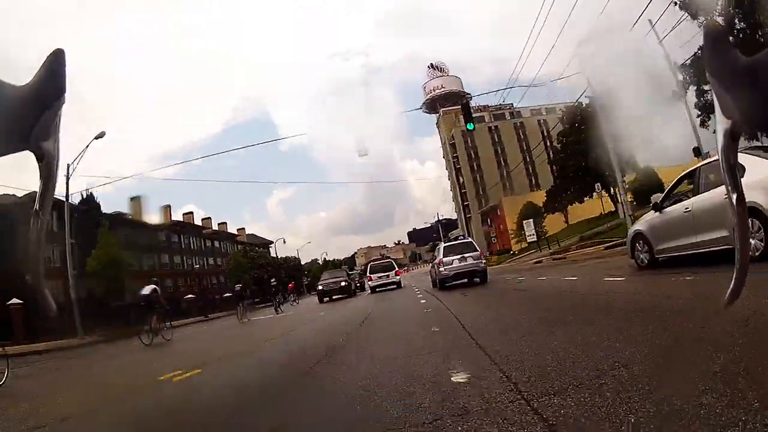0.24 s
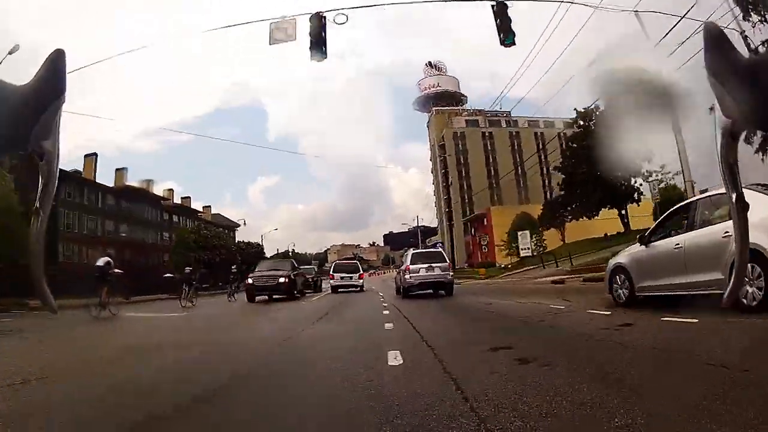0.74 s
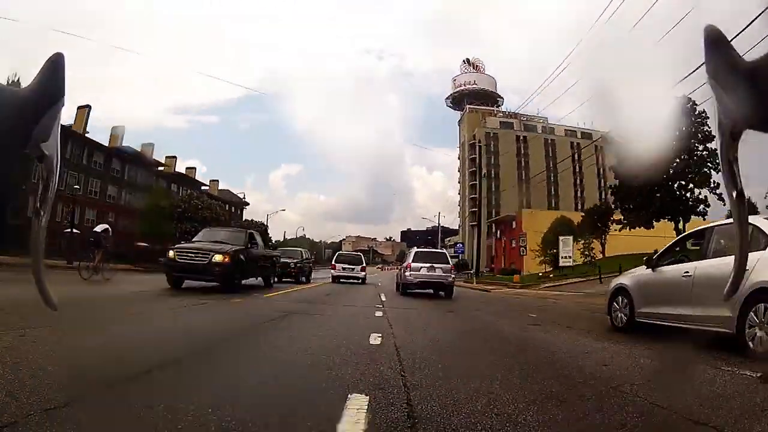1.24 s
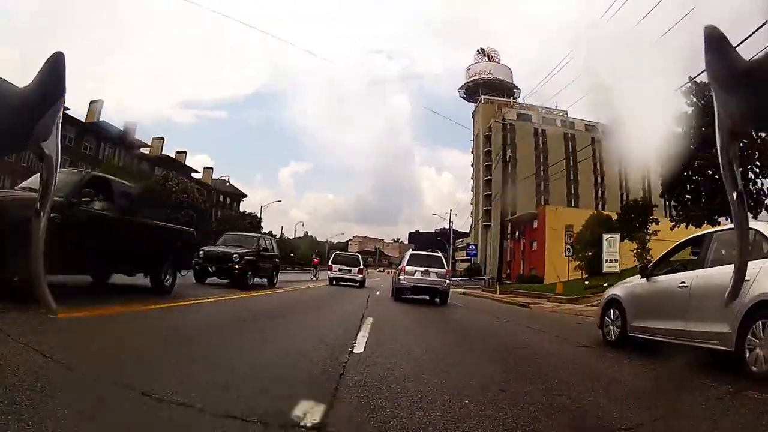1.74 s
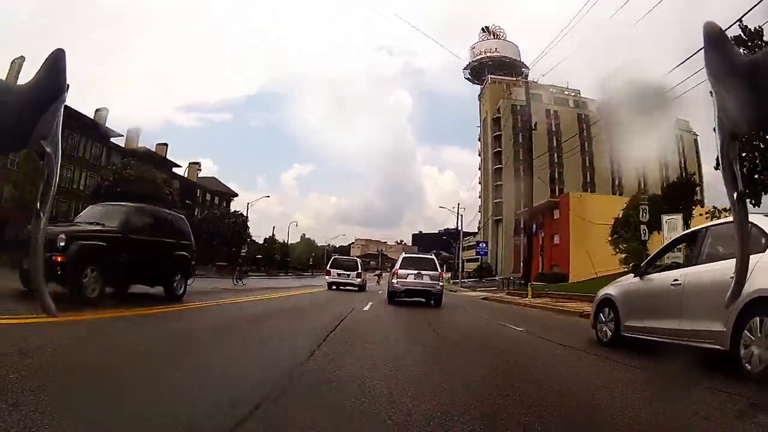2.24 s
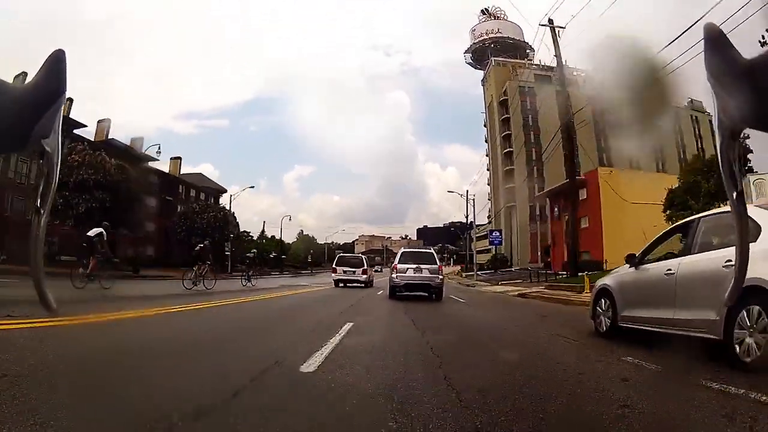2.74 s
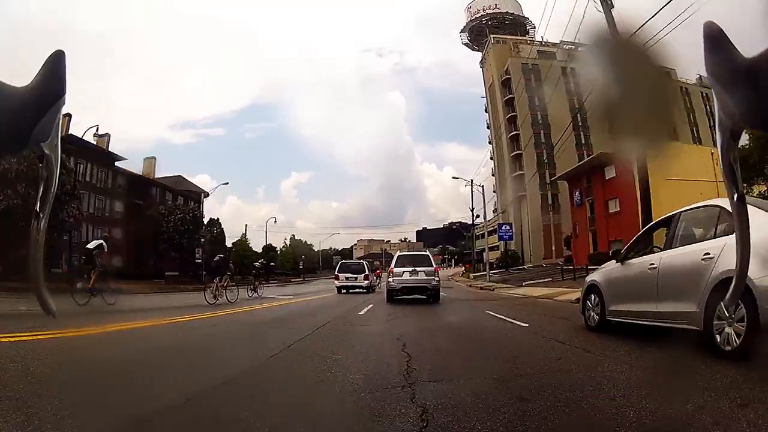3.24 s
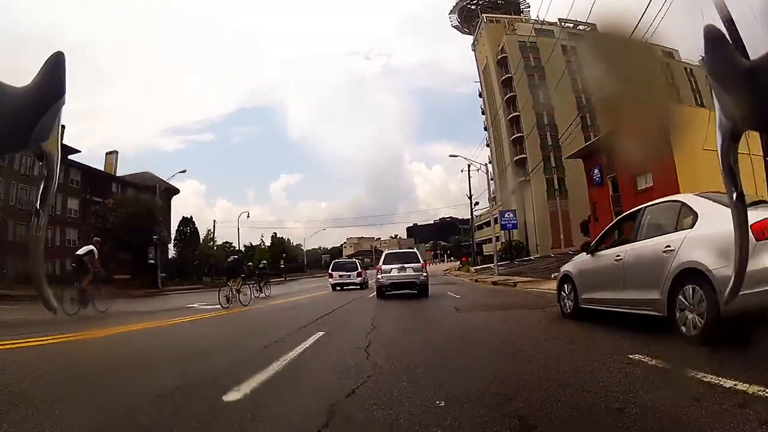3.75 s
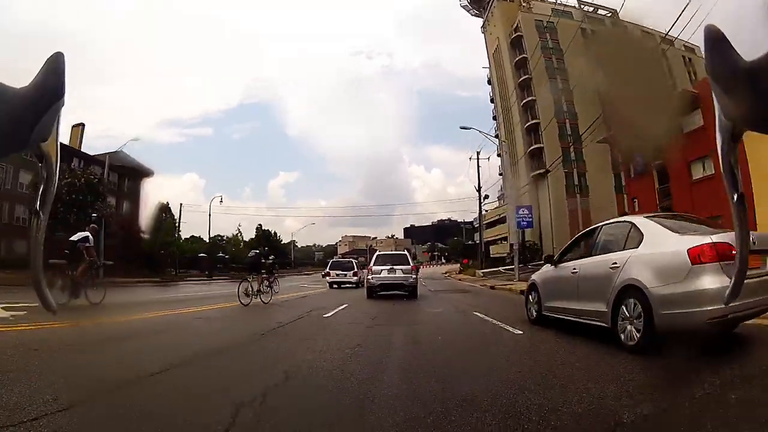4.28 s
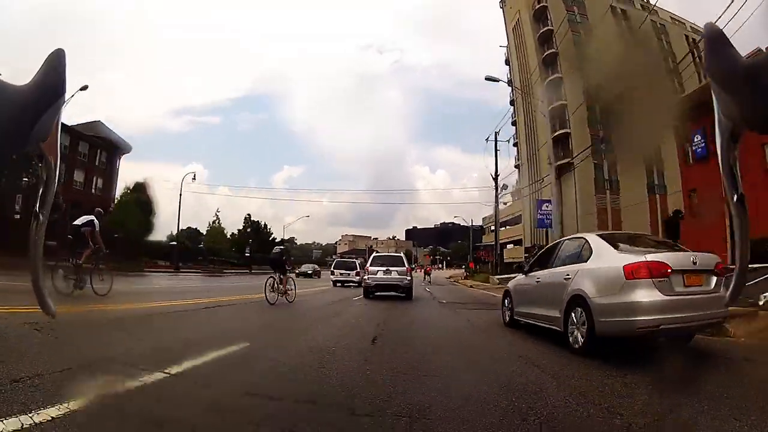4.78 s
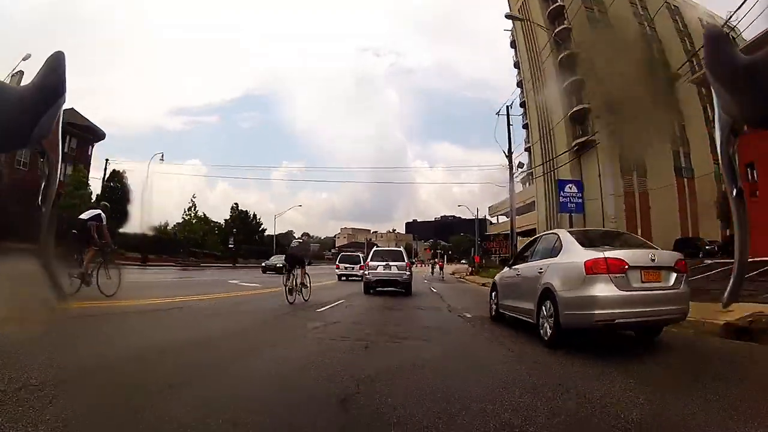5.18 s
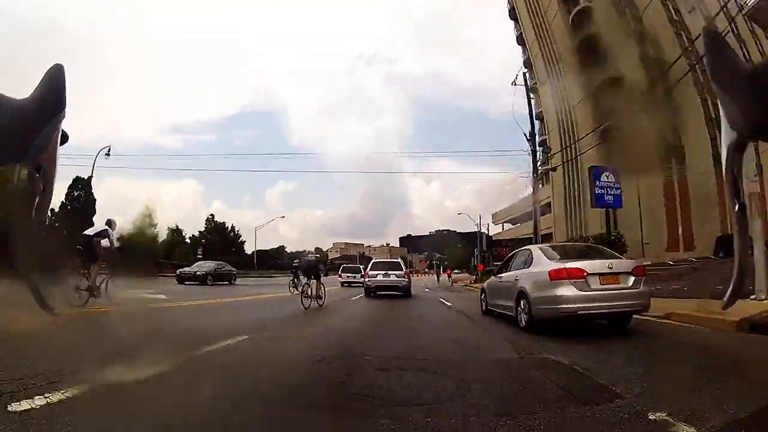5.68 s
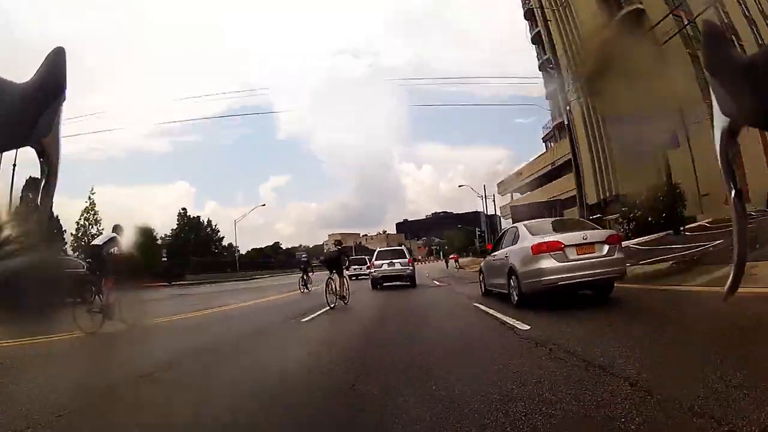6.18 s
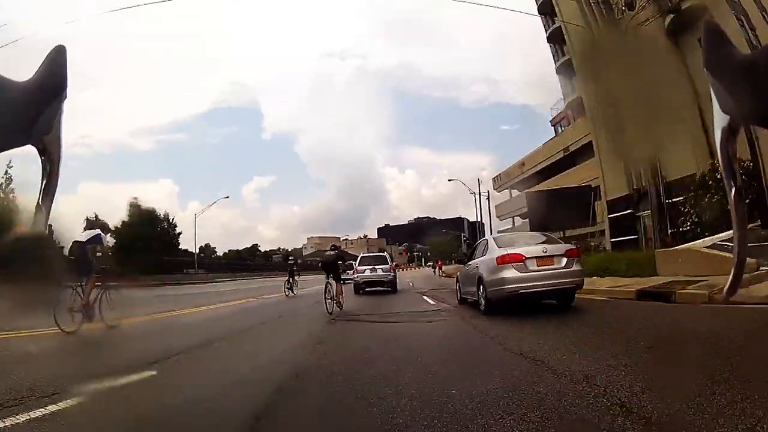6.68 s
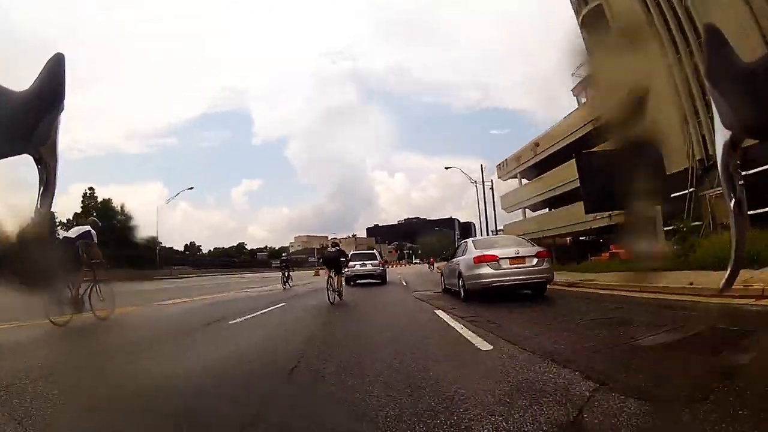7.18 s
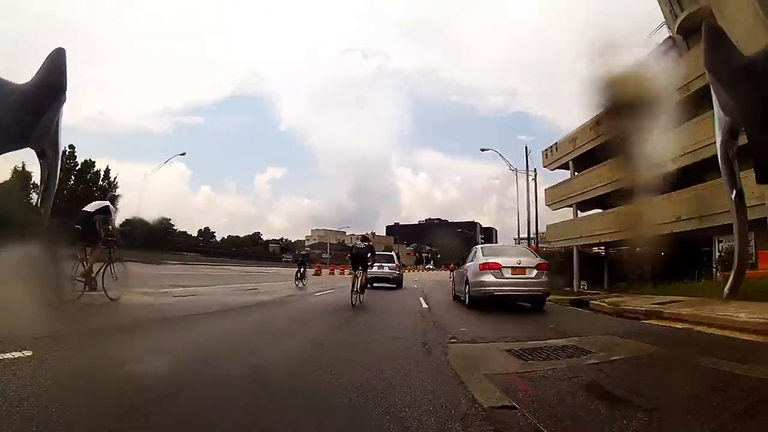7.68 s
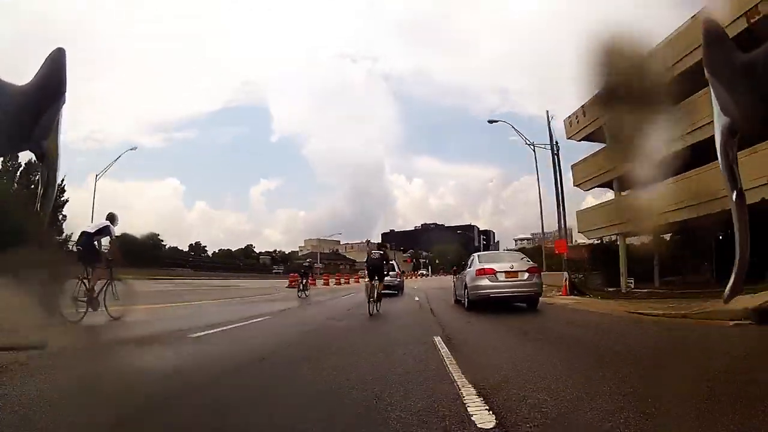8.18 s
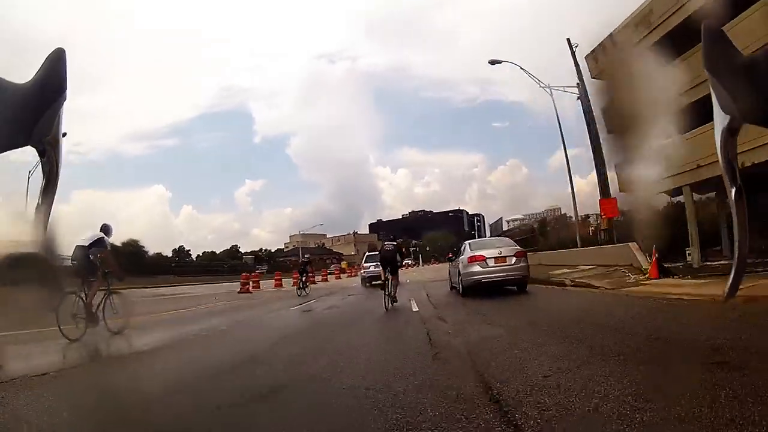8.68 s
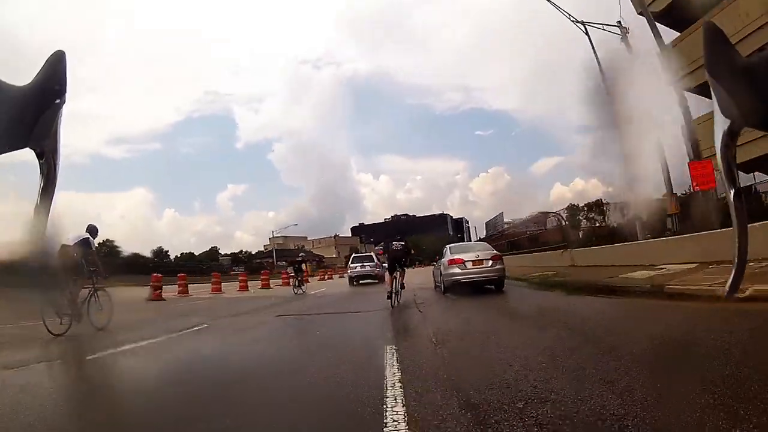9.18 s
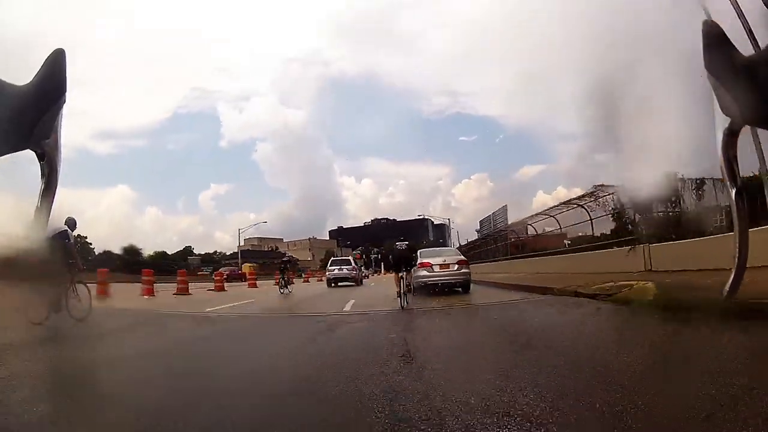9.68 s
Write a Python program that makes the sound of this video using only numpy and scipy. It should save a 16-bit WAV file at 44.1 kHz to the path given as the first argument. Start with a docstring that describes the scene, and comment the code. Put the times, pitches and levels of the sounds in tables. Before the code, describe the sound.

A road bike rolls over worn asphalt, heard through its handlebar: humming, tyre roar, sparse clicks, then heavy jolts and busy loose-case chatter.

```python
"""Road bike with a rattling handlebar camera

A road bike rolls over worn city asphalt, heard from a cased camera bolted to the handlebar.
Shaped noise makes the low rumble, the tyre roar that comes up through the frame, and the bar's 125 Hz hum.
The loose mount chatters with dry clicks, decaying modes of the case; jolts are short low swings.
Bright noise bursts are the chain. A limiter ducks everything after each loud knock,
and an uneven sample clock adds a thin sizzle."""
import sys
import numpy as np
from scipy import signal
from scipy.fft import rfft, irfft
from scipy.io import wavfile
from scipy.ndimage import uniform_filter1d, minimum_filter1d

SR = 44100
rng = np.random.default_rng(int(sys.argv[2]) if len(sys.argv) > 2 else 0)


def wrap_up_sound(samples):
    """Save the sound to the file named by the first command line argument, as 16-bit audio."""
    columns = np.atleast_2d(samples).T
    # keep every value between -1 and 1, then stretch to whole-number steps
    tamed = np.clip(columns, -1, 1)
    steps = np.round(tamed * 32767).astype(np.int16)
    wavfile.write(sys.argv[1], SR, steps)


N = 437913
TIME = np.arange(N) / SR
HZ = np.fft.rfftfreq(N, 1 / SR)

# shaking of the bike apart from rough patches: t/s, road rumble level/dB, handlebar hum level/dB
RIDE_LEVELS = [(0, -38, -43.5), (0.3, -34.5, -31), (1.1, -32, -31), (1.7, -31, -28), (2.6, -33.5, -34),
               (3.6, -34, -30.5), (4.3, -35.5, -30.5), (5.2, -34, -32), (5.7, -24.5, -35),
               (6.6, -34, -38.5), (7.7, -35, -37.5), (8.8, -32.5, -35), (9.93, -31.5, -32.5)]


def gain_of(db):
    """Decibel law: 20 dB is a factor of ten in amplitude."""
    return 10 ** (np.asarray(db) / 20)


def evened(x):
    """Normalisation of the mean power: scales to rms 1."""
    return x / np.sqrt(np.mean(x ** 2) + 1e-20)


def curves(rows):
    """Linear interpolation through time of each column of a table."""
    s, *columns = np.transpose(rows)
    return [np.interp(TIME, s, column) for column in columns]


def colour(points, at=HZ):
    """Spectral envelope: gains at the given frequencies, interpolated in dB over log frequency."""
    hz, db = np.transpose(points)
    return gain_of(np.interp(np.log(at + 1), np.log(hz), db))


def noise(gains):
    """Linear filtering of white noise: the given spectrum at rms 1."""
    spectrum = rfft(rng.standard_normal(N)) * gains
    return evened(irfft(spectrum, N))


def steadied(x, size):
    """Envelope normalisation: keeps the quick flutter of a noise and removes its slow swells."""
    local_power = uniform_filter1d(x ** 2, size)
    return x / np.sqrt(local_power + 1e-6)


def resonance(hz, width_hz):
    """Resonance curve: a steep-sided peak of gain 1 over HZ."""
    return 1 / (1 + ((HZ - hz) / width_hz * 2) ** 2 / 2) ** 1.57


def swell(u):
    """Critically damped impulse response: rises to 1 at u = 1, then dies away."""
    return u * np.exp(1 - u)


def add(mix, s, sound):
    """Superposition: mixes a sound in at time s."""
    part = mix[max(round(s * SR), 0):][:len(sound)]
    part += sound[:len(part)]


def patches(patch_s=0.08):
    """Common excitation: shaking in dB swells and fades over patch_s each way at each rough patch."""
    # rough patches of asphalt that set the handlebar throbbing: t/s, rise of the hum level/dB
    rough_spots = [(0.5, 6), (1.6, -0.5), (1.92, 7), (3.15, 0.5), (3.9, 2.5), (4.62, 0), (5.62, 6.5),
                   (6.12, 16), (7.47, 5), (8.29, 12.5), (8.62, 9), (9.92, 6.5)]
    return sum(db * np.exp(-((TIME - s) / patch_s) ** 2) for s, db in rough_spots)


def road_rumble(shake_db, patch_share=0.27):
    """Random vibration: the bike shaking on the road, a low noise that follows part of each patch."""
    # spectrum of the shaking: f/Hz, level per Hz/dB (relative)
    shaking = [(8, -28), (18, -15), (26, 2.5), (35, -1), (55, -2), (80, -2.5), (105, 0), (140, -2),
               (172, -10.5), (205, -22.5), (270, -46), (500, -45), (2000, -100)]
    rumble_db = curves(RIDE_LEVELS)[0]
    return gain_of(rumble_db + patch_share * shake_db) * steadied(noise(colour(shaking)), size=7000)


def handlebar_hum(shake_db, bar_hz=125, width_hz=7):
    """Narrow-band random response: one lightly damped bending mode gives a throbbing hum."""
    narrow = 1 / (1 + ((HZ - bar_hz) / width_hz) ** 2) ** 1.32
    hum_db = curves(RIDE_LEVELS)[1]
    return gain_of(hum_db + shake_db) * steadied(noise(narrow), size=5000)


def tyre_roar(shake_db, patch_share=0.17, coarseness_db=1.24):
    """Forced vibration: the grain of the asphalt excites the resonances of frame and case."""
    # resonances of frame and case under the tyre noise: f/Hz, width/Hz, level/dB
    modes = [(398, 61, 2), (444, 24, -2.5), (523, 60, 1), (568.6, 35, 3.5), (609, 127, -3), (832, 87, 0),
             (990, 220, -2.5), (1133, 96, 0.5), (1575, 75, -9.5), (1797, 143, -9.5), (2011, 233, -8.5),
             (2285, 100, -18), (2793, 180, -26.5), (3353, 386, -24.5)]
    # tyre noise between the resonances: f/Hz, level per Hz/dB (relative)
    floor = [(100, -17), (200, -37), (300, -43), (700, -15.5), (1350, -15.5), (2100, -18.5), (2550, -72),
             (4000, -44), (5000, -41.5), (6000, -63), (8000, -52), (10000, -37), (16000, -65)]
    # tyre roar apart from rough patches: t/s, level/dB
    roar_levels = [(0, -46.5), (0.17, -38), (0.7, -40), (1.7, -38.5), (2.3, -40.5), (2.6, -38),
                   (3.25, -39.5), (3.5, -39), (4.15, -41), (4.95, -38.5), (5.6, -40), (6.35, -29),
                   (6.7, -42), (6.95, -36), (7.4, -42.5), (7.8, -37), (8.5, -35), (9.05, -40.5),
                   (9.55, -37), (9.93, -41.5)]
    power = colour(floor) ** 2
    for hz, width_hz, db in modes:
        power += (gain_of(db) * resonance(hz, width_hz)) ** 2
    coarseness = noise(1 / (1 + (HZ / 40) ** 2))  # slow variation of the asphalt's grain
    grain = noise(np.sqrt(power)) * gain_of(coarseness_db * coarseness)
    return gain_of(curves(roar_levels)[0] + patch_share * shake_db) * grain


def case_ring(hardness, detune=0.048, spread_db=3.0, contact_s=0.00023,
              rasp_db=-19, rasp_s=0.0011, push_db=-15, push_s=0.00087):
    """Modal synthesis: a contact pushes, rasps and rings the case; hard ones favour higher modes."""
    # modes of the camera case: f/Hz, soft-knock level/dB, hard-knock level/dB, t60/s
    case_modes = [(288, -17.5, -18.5, 0.029), (510, -6, -14, 0.0094), (998, -1.5, 1, 0.0078),
                  (1244, 9.5, -0.5, 0.0062), (1672, -1.5, -10, 0.015), (2104, -9, 5, 0.011),
                  (3213, -20.5, -3.5, 0.0092), (3720, -31, -13, 0.014), (4900, -42, -18.5, 0.014),
                  (6530, -5.5, -4.5, 0.0011)]
    # the rasp of a contact: f/Hz, level per Hz/dB (relative)
    rasp_spectrum = [(300, -6), (1000, 10.5), (2200, 7), (2800, -38), (4600, -9), (6100, -53), (7700, -7.5),
                     (11000, -13), (16000, -43)]
    t = np.arange(1024) / SR
    hz, soft_db, hard_db, t60 = np.transpose(case_modes)[:, :, None]
    shift, weight = rng.standard_normal((2, len(case_modes), 1))  # no two contacts alike
    db = soft_db + (hard_db - soft_db) * np.clip(hardness, 0, 1) + spread_db * weight
    partials = gain_of(db - 60 * t / t60) * np.sin(2 * np.pi * hz * (1 + detune * shift) * t)
    ring = -partials.sum(0)
    ring *= 1 - np.exp(-t / contact_s)  # plastic gives a little, so the force builds up
    rasp_gains = colour(rasp_spectrum, np.fft.rfftfreq(len(t), 1 / SR))
    rasp = evened(irfft(rfft(rng.standard_normal(len(t))) * rasp_gains))
    push = -gain_of(push_db) * swell(t / push_s)  # the wall of the closed case flexes one way
    return ring / abs(ring).max() + gain_of(rasp_db) * rasp * swell(t / rasp_s) + push


def chatter(per_s=200, count=16, shudder_db=-2, uneven_db=6.5, hardest=0.8):
    """Random impulse trains convolved with case rings: light contacts, with a shudder of the loose camera."""
    # small ticks between the knocks: t/s, level/dB
    tick_levels = [(0, -64), (.8, -67), (1.4, -61.5), (2.6, -64), (3.8, -59), (4.3, -67), (5.2, -57),
                   (5.8, -36.5), (6.3, -38), (7, -48.5), (7.4, -42), (7.9, -48), (8.5, -39), (8.7, -47.5),
                   (9.93, -45)]
    ticks = np.zeros(N)
    for _ in range(count):  # the contacts are shared among this many rings
        struck = rng.random(N) < per_s / count / SR
        sizes = gain_of(uneven_db * np.minimum(rng.exponential(1, N), 3)) * struck
        ring = case_ring(hardest * rng.random())
        ticks += signal.oaconvolve(sizes * rng.choice([-1, 1], N), ring)[:N]
    shudder = gain_of(shudder_db) * noise(resonance(282, 180))
    return (evened(ticks) + shudder) * gain_of(curves(tick_levels)[0])


def chain(per_s=45, db=-73, rustle_s=0.0036):
    """Amplitude-modulated noise: faint bright rustles of the drive train."""
    links = rng.uniform(0.56, 1, N) * (rng.random(N) < per_s / SR)
    rustle = swell(np.arange(SR // 20) / SR / rustle_s)
    bursts = signal.oaconvolve(links, rustle)[:N]
    bright = noise(resonance(4430, 1100) + 0.66 * resonance(7200, 960))
    return gain_of(db) * evened(bursts * bright)


def rattle_clicks(rock_s=0.035, uneven_db=2, typical_db=-13, typical_hardness=0.15,
                  hardness_per_db=0.03, uneven_hardness=0.05):
    """Near-periodic impacts: each bout is an even run of clicks that grows or fades, stronger ones harder."""
    # bouts of the camera rocking in its mount: first click t/s, last click t/s, first level/dB, last level/dB
    bouts = [(0.9246, 0.963, -12.5, -21.5), (1.2214, 1.298, -19, -16.5), (1.337, 1.4136, -19.5, -7.5),
             (1.6805, 1.757, -14.5, -13.5), (2.2057, 2.246, -17.5, -10), (3.723, 3.759, -10, -13.5),
             (4.0155, 4.048, -18.5, -11.5), (5.534, 5.5742, -8, -15.5), (5.8117, 5.869, -7, -9),
             (6.263, 6.326, -12, -16), (6.5002, 6.5948, -21, -9.5), (6.628, 6.721, -14, -18.5),
             (6.8757, 6.9123, -28, -16), (6.978, 7.11, -12, -14.5), (7.566, 7.7057, -15.5, -10.5),
             (7.7698, 7.909, -23, -20.5), (7.9633, 8.0662, -11, -15), (8.103, 8.175, -5, -14),
             (8.3172, 8.42, -2.5, -10.5), (8.4756, 8.5493, -11.5, -7), (8.7606, 8.871, -16, -16),
             (8.9506, 9.1956, -10.5, -11), (9.2374, 9.3413, -11.5, -13), (9.403, 9.513, -10, -20),
             (9.603, 9.7435, -12.5, -10.5), (9.813, 9.886, -22, -15)]
    clicks = []
    for first_s, last_s, first_db, last_db in bouts:
        count = round((last_s - first_s) / rock_s) + 1
        strength, contact = rng.standard_normal((count, 2)).T
        db = np.linspace(first_db, last_db, count) + uneven_db * strength
        hardness = typical_hardness + hardness_per_db * (db - typical_db) + uneven_hardness * contact
        clicks += zip(np.linspace(first_s, last_s, count), db, hardness)
    return clicks


def mount(rebound_db=-19, soonest_s=0.0042, latest_s=0.021):
    """Impact and rebound: the camera knocks against the play in its mount, then again lightly."""
    # single knocks, when a bump throws the camera against its stop: t/s, level/dB, hardness (0-1)
    knocks = [(0.513, -16, 0.25), (0.5901, -16, 0.3), (1.0889, -10.5, 0.46), (1.549, -9.5, 0.44),
              (1.581, -3.5, 0.4), (1.6262, -5, 0.35), (2.0234, -10.5, 0.05), (5.2637, -10, 0.5),
              (5.4604, -10, 0.55), (5.6665, -6, 0.4), (5.6693, 7.5, 1), (5.7023, 2, 0.4), (5.7203, 0, 0.83),
              (5.732, -0.5, 0.75), (5.737, -1.5, 0.9), (5.7676, 7.5, 0.97), (5.8371, -1, 0.9),
              (5.934, -0.5, 0.37), (6.0017, 5, 0.1), (6.0048, 8.5, 0.9), (6.0703, 0, 0.44),
              (6.075, 8, 0.97), (6.108, 2, 0.2), (6.1127, 1, 0.9), (6.1431, -3.5, 0.3), (6.201, -8.5, 0.2),
              (6.4004, -9, 0), (7.275, -9, 0.8), (7.3138, -13.5, 0.4), (7.3409, -7.5, 0.97),
              (7.3889, -14.5, 0.2), (7.3999, -14.5, 0.7), (7.4401, -5, 0.16), (7.464, -3.5, 1),
              (7.5012, -6, 0.68), (7.8391, -11, 0), (8.2812, -3, 0.3), (8.2835, 1, 0.3), (8.446, -13, 0.3),
              (8.5772, -7.5, 0.2), (8.919, -14, 0.34)]
    out = np.zeros(N)
    for s, db, hardness in list(knocks) + rattle_clicks():
        add(out, s, gain_of(db) * case_ring(hardness))
        rebound = gain_of(db + rebound_db) * case_ring(hardness)
        add(out, s + rng.uniform(soonest_s, latest_s), rebound)
    return out


def jolts(swing_cycles=0.74, thud_db=-10, lowest_thud_hz=171.1, highest_thud_hz=307.4, thud_s=0.0028):
    """Damped oscillation: each bump swings the front of the bike briefly, with a short thud from the tyre."""
    # the wheels drop into cracks: t/s, level/dB, swing f/Hz
    cracks = [(1.555, -12.5, 71.6), (3.177, -17.5, 117), (3.655, -14, 111), (5.609, -21.5, 60.6),
              (5.642, -15, 56), (5.746, -9, 62), (5.914, -1.5, 76.7), (5.991, -5.5, 87), (6.023, -3.5, 80),
              (7.253, -2, 89)]
    out, t = np.zeros(N), np.arange(SR // 8) / SR
    for s, db, hz in cracks:
        swing = swell(t * hz / swing_cycles) ** 2 * np.sin(2 * np.pi * hz * t)
        thud_hz = rng.uniform(lowest_thud_hz, highest_thud_hz)
        thud = swell(t / thud_s) ** 2 * np.sin(2 * np.pi * thud_hz * t)
        add(out, s, gain_of(db) * (swing + gain_of(thud_db) * thud))
    return out


def scene():
    """Structure-borne sound: everything reaches the microphone through the bike itself, so it is dry."""
    shake_db = patches()
    ride = road_rumble(shake_db) + handlebar_hum(shake_db) + tyre_roar(shake_db)
    return (ride + chatter() + chain() + mount() + jolts())[None]


def limiter(x, ceiling_db=-22.6, recovery_db_per_s=58, headroom_db=3, attack_s=0.00035):
    """Gain reduction: falls within about a millisecond of a peak, creeps back; overshoots are rounded off."""
    over_db = np.maximum(20 * np.log10(abs(x) + 1e-9) - ceiling_db - headroom_db, 0)
    fall = TIME * recovery_db_per_s
    held_db = np.maximum.accumulate(over_db + fall) - fall  # peaks held, decaying at a steady rate
    lag = np.exp(-1 / (attack_s * SR))
    gain_db = signal.lfilter([1 - lag], [1, -lag], minimum_filter1d(-held_db, size=31))
    y = x * gain_of(gain_db - ceiling_db)  # the ceiling is now 1
    return gain_of(ceiling_db) * y / (1 + y ** 6) ** (1 / 6)


def clock_jitter(y, clock_hz=12000, jitter_db=-90):
    """Phase modulation: a timing error (dB re 1 s) mirrors the sound around clock_hz."""
    clock = np.cos(2 * np.pi * clock_hz * TIME)
    slope = np.gradient(y) * SR
    return y + gain_of(jitter_db) * clock * slope  # to first order, slope times timing error


def record(dry, edge_hz=16500):
    """Signal chain: limiter, clock jitter, then the band limit."""
    y = clock_jitter(limiter(dry[0]))
    treble_edge = colour([(14000, -0.5), (14600, -1), (15500, -34), (16500, -34)])
    y = irfft(rfft(y) * treble_edge, N)
    low_pass = signal.firwin(511, edge_hz, window=("kaiser", 9), fs=SR)
    return signal.oaconvolve(y, low_pass, "same")[None]


dry = scene()
out = record(dry)
wrap_up_sound(out)
```